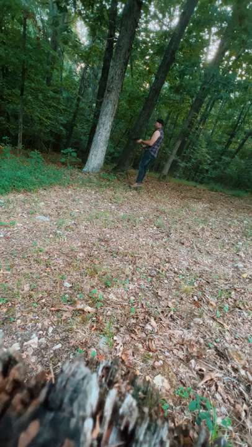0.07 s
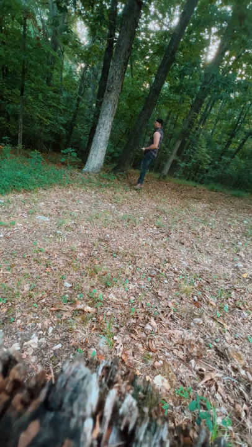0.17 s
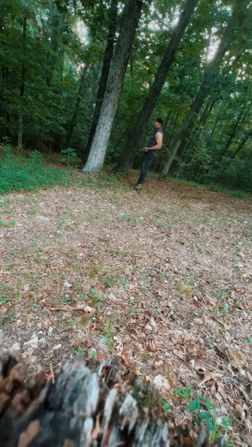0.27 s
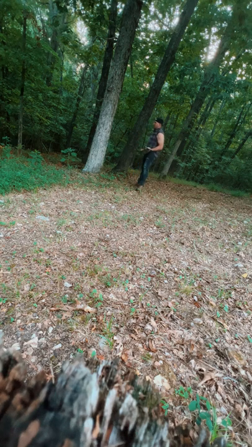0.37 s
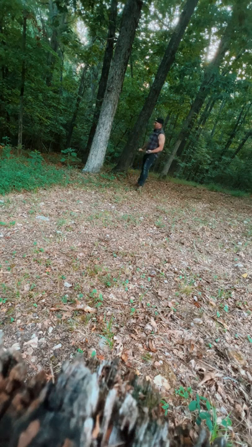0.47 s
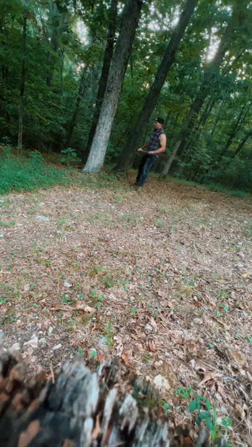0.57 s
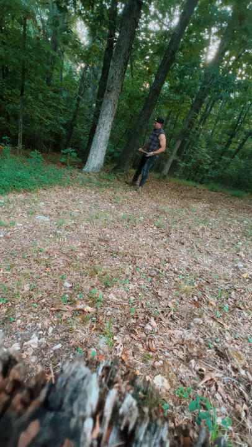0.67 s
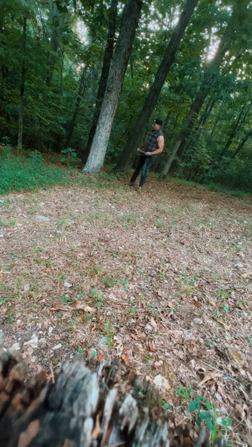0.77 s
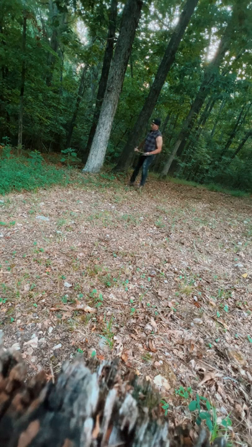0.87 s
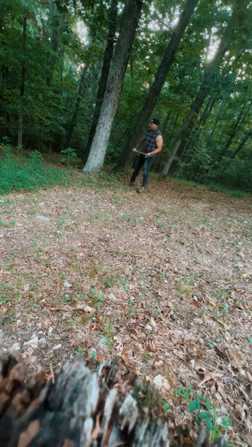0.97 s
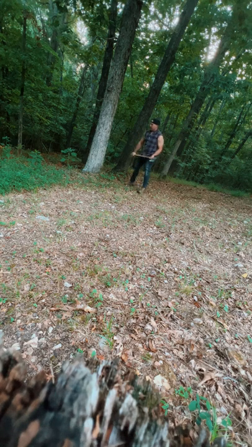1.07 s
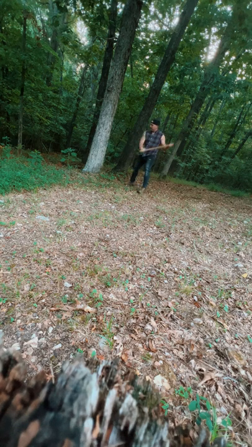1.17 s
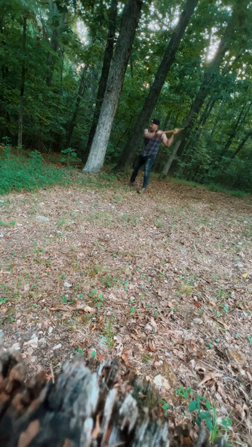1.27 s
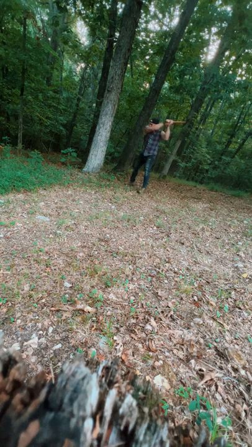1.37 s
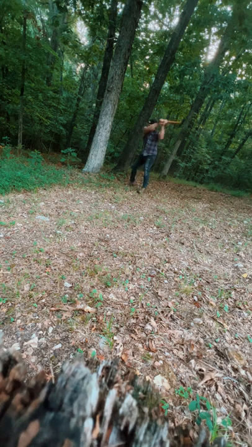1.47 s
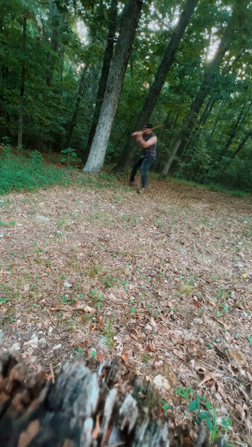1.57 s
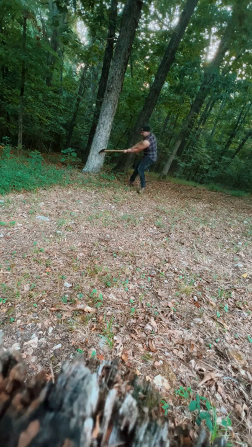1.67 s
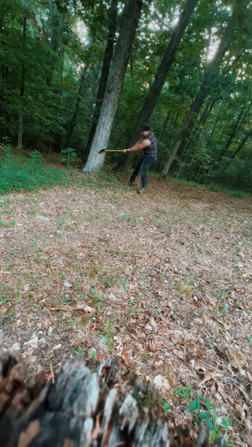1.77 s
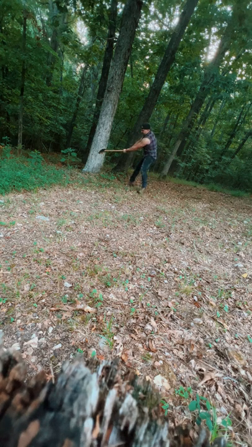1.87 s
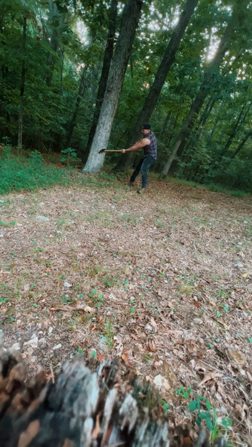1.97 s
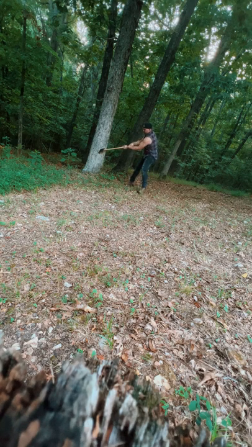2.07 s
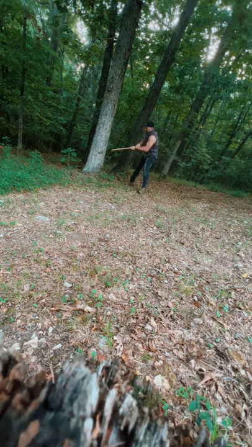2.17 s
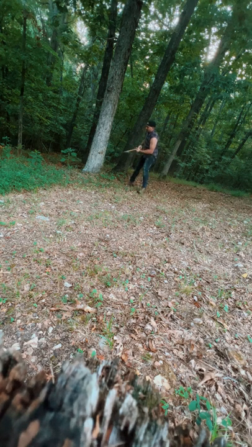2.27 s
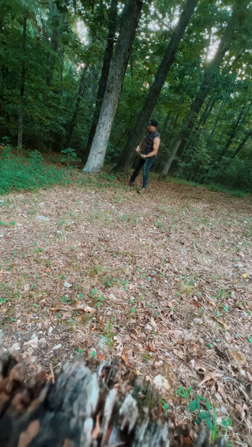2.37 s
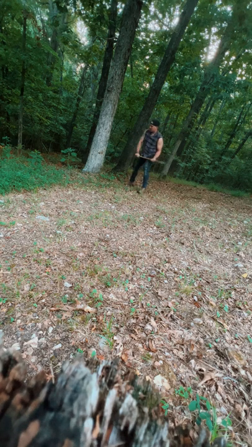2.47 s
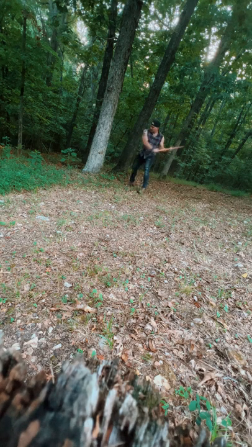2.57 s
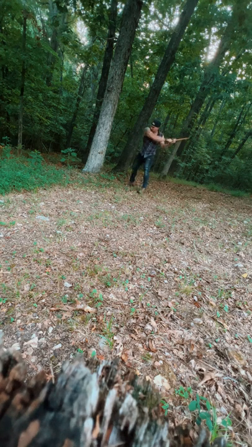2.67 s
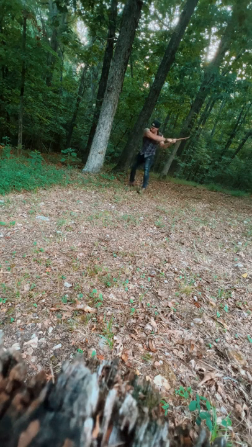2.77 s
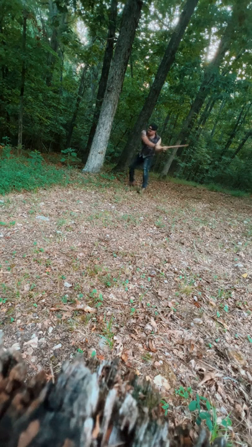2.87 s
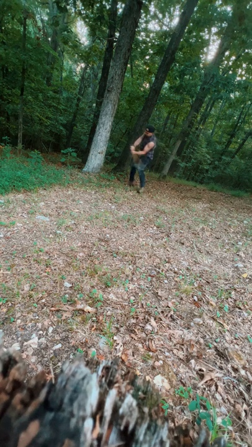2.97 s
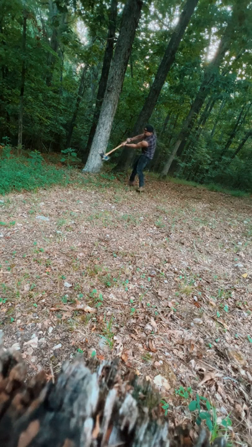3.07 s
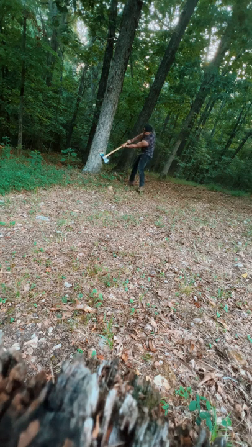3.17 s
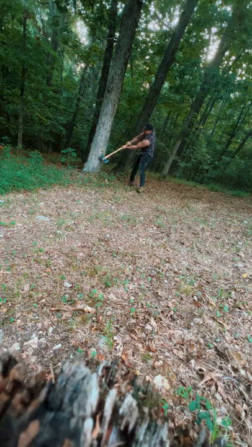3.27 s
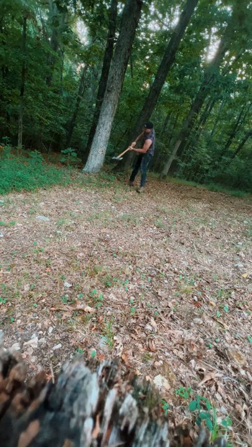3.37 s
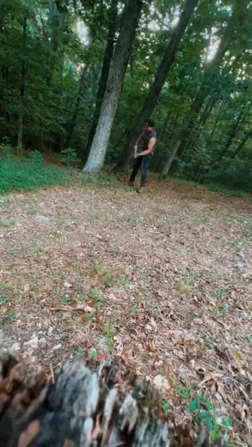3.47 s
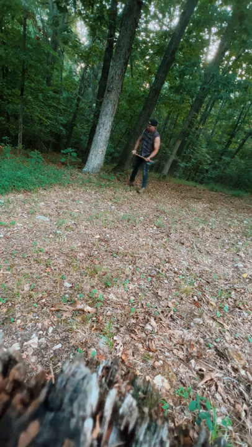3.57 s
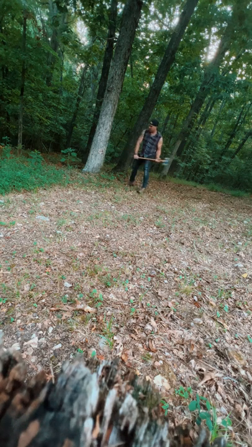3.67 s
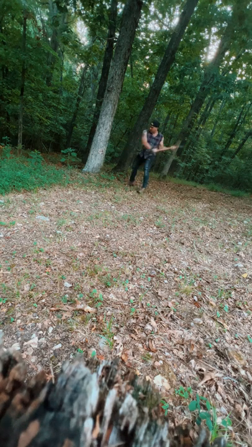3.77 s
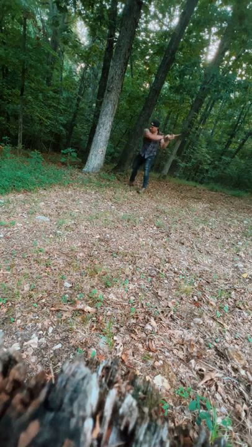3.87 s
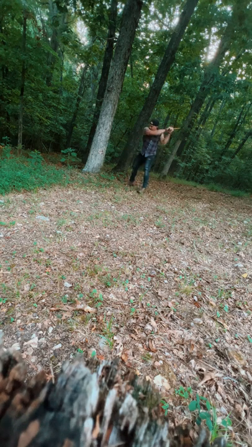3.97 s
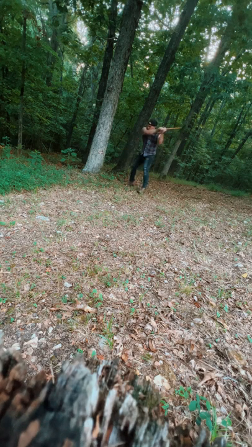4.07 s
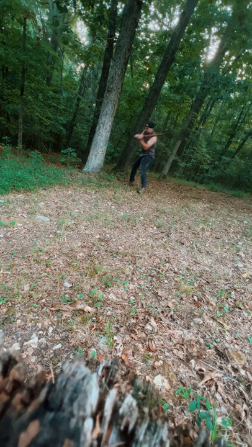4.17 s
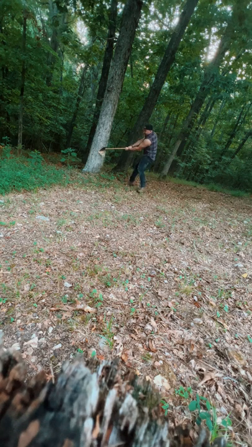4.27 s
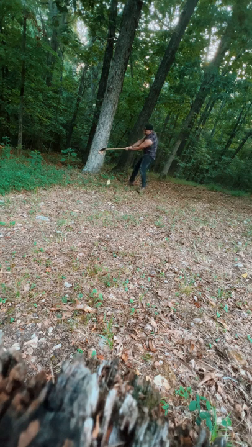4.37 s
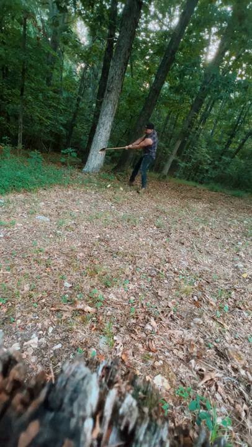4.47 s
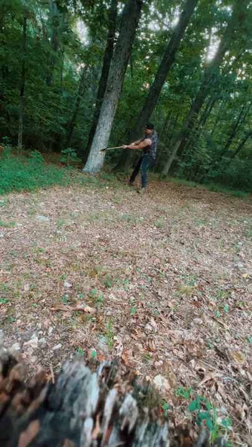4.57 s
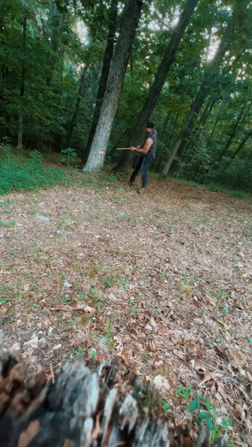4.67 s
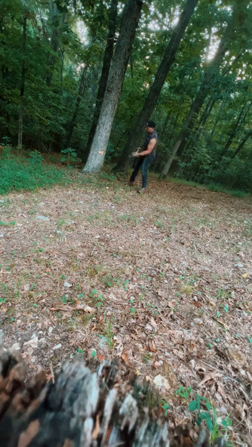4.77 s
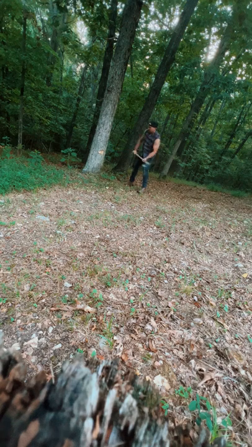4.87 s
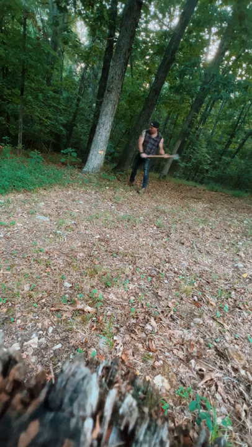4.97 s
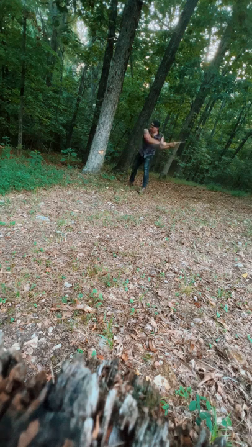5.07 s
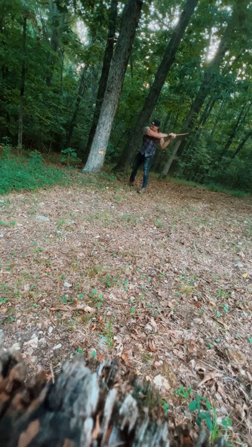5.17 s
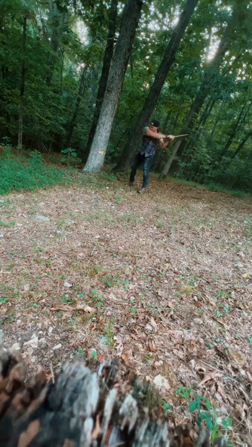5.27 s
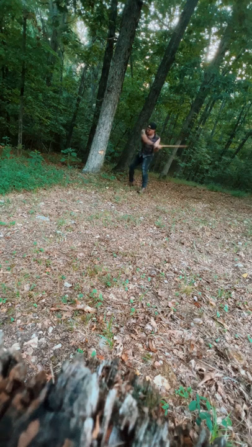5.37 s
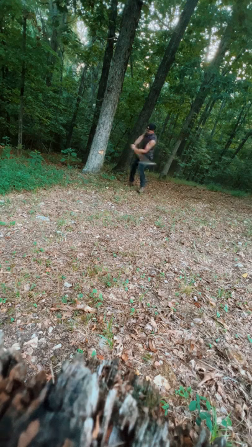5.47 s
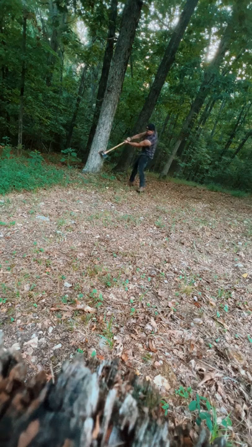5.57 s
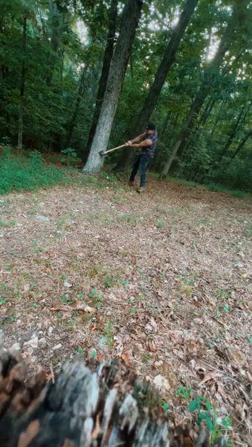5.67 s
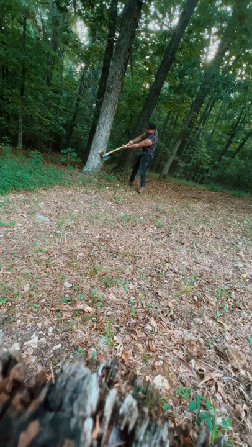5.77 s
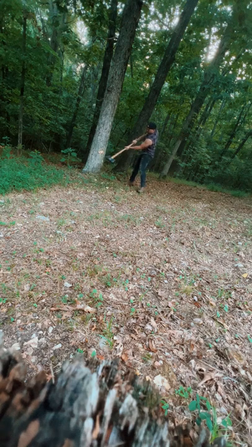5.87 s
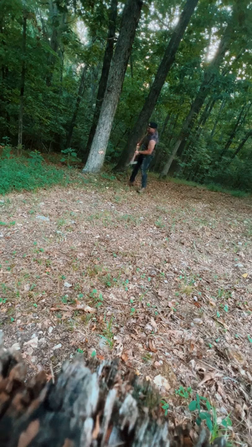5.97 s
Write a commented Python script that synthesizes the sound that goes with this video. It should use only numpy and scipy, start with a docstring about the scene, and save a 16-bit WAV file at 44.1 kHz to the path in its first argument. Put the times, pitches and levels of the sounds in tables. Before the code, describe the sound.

Four strong axe blows on a live tree, heard several metres off across soft leaf-covered ground. Each begins with a hard dry crack, knocks hollowly, then drops into a short thump, with wide woodland reverberation and a faint late echo. Leaves crunch softly beforehand, a dim far call passes early, and wood chips tick between strokes. Quiet high insects, low rumble and wavering far engines continue throughout.

```python
"""Axe blows in a clearing

Four blows into a standing tree, heard across leaf-covered ground: each cracks (shaped noise), rings
and thumps (damped modes). Soft ground delays the lows, so each blow sweeps downward; near trunks and
woods scatter it; a faint centred repeat follows 0.39 s later. Chips tick and dry leaves rustle (noise
bursts); a far call, insects and low rumble are filtered noise, far engines are wavering sines."""
import sys
import numpy as np
from scipy import signal
from scipy.fft import rfft, irfft, next_fast_len
from scipy.io import wavfile
from scipy.ndimage import uniform_filter1d, minimum_filter1d

SR = 44100
rng = np.random.default_rng(int(sys.argv[2]) if len(sys.argv) > 2 else 0)


def int16_out(signal):
    """Quantize to a 16-bit WAV file."""
    q = np.round(np.clip(np.atleast_2d(signal).T, -1, 1) * 32767)
    wavfile.write(sys.argv[1], SR, q.astype(np.int16))


N = 265041
T = np.arange(N) / SR
SIZE = 65536  # length of blows and responses, samples
T_RESPONSE = np.arange(SIZE) / SR
F = np.maximum(np.arange(SIZE // 2 + 1) * SR / SIZE, 1)


def undb(db):
    """Decibels to gain."""
    return 10 ** (np.asarray(db) / 20)


def unit(x):
    """Scale to rms 1."""
    return x / np.sqrt(np.mean(x ** 2))


def across(hz, table, axis=1):
    """Read a table column along log frequency."""
    table = np.array(table)
    return np.interp(np.log(np.maximum(hz, 1)), np.log(table[:, 0]), table[:, axis])


def along(table, axis=1):
    """Read a table column along time."""
    table = np.array(table)
    return np.interp(T, table[:, 0], table[:, axis])


def shape(x, gain):
    """Filter by a gain given as a function of frequency."""
    size = next_fast_len(x.shape[-1] + 4096)
    f = np.maximum(np.fft.rfftfreq(size, 1 / SR), 1)
    return irfft(rfft(x, size) * gain(f), size)[..., :x.shape[-1]]


def mode(f, hz, width_hz):
    """Response of one damped resonance, 1 at its centre."""
    return 1 / (1 + 1j * (f ** 2 - hz ** 2) / (f * width_hz))


def delay(s):
    """Pure delay as a phase slope over F."""
    return np.exp(-2j * np.pi * F * s)


def walk(knots_per_s):
    """Random curve, linear between 1024 unit-variance knots; holds the last knot if they run out."""
    knots = rng.standard_normal(1024)
    return np.interp(T * knots_per_s, np.arange(len(knots)), knots)


def add(track, s, x):
    """Mix a sound in at a time."""
    start = max(int(s * SR), 0)
    track[start:start + len(x)] += x[:N - start]


# low outdoor rumble spectrum: f/Hz, relative level/dB
RUMBLE = [(25, -32), (40, -22), (62, -14), (85, -4.5), (125, -7), (200, -15), (250, -13), (310, -21),
          (450, -24.5), (700, -30.5), (1200, -31.5), (2400, -38), (8000, -46)]
# insect chorus spectrum: f/Hz, relative level/dB
INSECTS = [(7000, -44.5), (8300, -21.5), (9050, -0.5), (9500, 1.5), (10000, 0), (10800, -5.5), (11600, -28),
           (13000, -26.5), (16000, -35)]
RUMBLE_DB, INSECT_DB = -54, -58


def background():
    """Low outdoor rumble and an insect chorus: coloured noise, its level fluttering slightly."""
    rumble = unit(shape(rng.standard_normal(N), lambda f: undb(across(f, RUMBLE))))
    insects = unit(shape(rng.standard_normal(N),
                         lambda f: undb(across(f, INSECTS)) / (1 + (5000 / f) ** 4)))
    return rumble * undb(RUMBLE_DB + .5 * walk(2.4)) + insects * undb(INSECT_DB + 1.3 * walk(45))


# far engine under changing load: t/s, main tone f/Hz, level/dB
ENGINE = [(0.0, 130.0, -60.5), (0.7, 122.0, -61.5), (1.5, 116.5, -64.5), (2.15, 126.5, -58.5),
          (2.9, 143.5, -53.5), (3.9, 156.5, -60), (5.4, 151.5, -53.5), (6.0, 128.5, -57)]
# its harmonics: multiple of main tone, relative level/dB
ENGINE_ORDERS = [(.5, -9), (1, 1.5), (1.5, -7)]
# hum of a far mains-driven machine: multiple of mains frequency, level/dB
HUM = [(3, -64.5), (4, -61), (6, -68.5)]
# drone of a second far motor: multiple of its speed, level/dB
FAN = [(3, -68.5), (6, -76.5), (7, -74.5)]
MAINS_HZ, FAN_HZ = 60, 88
ENGINE_WAVER, HUM_WAVER, FAN_WAVER = 0.0035, 0.00058, .0015  # fraction of f


def engines():
    """Far motors as sines: one rises and falls in speed, two hum with slight waver."""
    def tone(hz, db, waver):
        level = np.sqrt(2) * undb(db + 0.62 * walk(2.1))
        return level * np.sin(2 * np.pi * np.cumsum(hz * (1 + waver * walk(10))) / SR)
    main_hz, main_db = along(ENGINE), along(ENGINE, axis=2)
    motor = sum(tone(k * main_hz, main_db + db, ENGINE_WAVER) for k, db in ENGINE_ORDERS)
    hum = sum(tone(k * MAINS_HZ, db, HUM_WAVER) for k, db in HUM)
    fan = sum(tone(k * FAN_HZ, db, FAN_WAVER) for k, db in FAN)
    return motor + hum + fan


CALL_S, CALL_ATTACK_S, CALL_HOLD_S = .76, .11, .2
CALL_DB, CALL_FADE_DB_PER_S = -64, 32
CALL_HZ, CALL_WIDTH_HZ = 1229, 330


def far_call():
    """Faint far call, blurred by the woods to resonant noise: swells, holds, fades."""
    call = unit(shape(rng.standard_normal(N), lambda f: mode(f, CALL_HZ, CALL_WIDTH_HZ) ** 2))
    age = T - CALL_S
    fading_s = np.maximum(age - CALL_ATTACK_S - CALL_HOLD_S, 0)
    swell = np.clip(age / CALL_ATTACK_S, 0, 1)
    return call * swell * undb(CALL_DB - CALL_FADE_DB_PER_S * fading_s)


SPRAY_FLIGHT_S, SPRAY_RISE_S, SPRAY_DECAY_S = 0.12, 0.067, 0.051


def spray(age):
    """Envelope of bark after a blow: it flies, lands in the leaves, trickles out."""
    late = age - SPRAY_FLIGHT_S
    return np.exp(-(np.minimum(late, 0) / SPRAY_RISE_S) ** 2 - np.maximum(late, 0) / SPRAY_DECAY_S)


# dry-leaf spectrum: f/Hz, relative level/dB
LEAVES = [(500, 7.5), (1500, 0), (3000, -4.5), (6500, -1.5), (10000, 2), (13000, 1), (16000, -1.5)]
# rustles in dry leaves, from boots or falling bark: t/s, half length/s, level/dB
RUSTLES = [(.40, 0.067, -60), (.53, .025, -64), (.75, 0.14, -60), (.95, 0.11, -54.5), (1.2, .015, -59),
           (1.325, .025, -69), (2.326, 0.032, -61), (2.612, 0.053, -66), (3.39, 0.2, -62),
           (3.729, 0.014, -72), (3.9, 0.036, -66.5), (4.228, .042, -63), (5.033, 0.025, -64.5)]
CRUNCH_DB, CRUNCH_KNOTS_PER_S = 3, 290  # uneven give; knots run out after about 3.5 s
LEAF_STIR_DB = -86


def leaves():
    """Dry leaves as noise of uneven grains: separate rustles, and bark sprayed by each blow."""
    grains = rng.standard_normal(N) * undb(3.6 * np.minimum(rng.exponential(size=N), 5))
    crackle = unit(shape(grains, lambda f: undb(across(f, LEAVES)) / (1 + (300 / f) ** 2)))
    rustles = sum(undb(db) * np.exp(-((T - s) / length) ** 2) for s, length, db in RUSTLES)
    bark = sum(undb(spray_db) * spray(T - s) for s, *_, spray_db in CHOPS)
    crunch = undb(CRUNCH_DB * walk(CRUNCH_KNOTS_PER_S))
    return crackle * ((rustles + bark) * crunch + undb(LEAF_STIR_DB + 1.2 * walk(18)))


# larger chips landing, twigs snapping: t/s, peak level/dB, treble level/dB
CHIPS = [(0.74, -36.5, 7), (0.8355, -38, 12), (3.228, -35, 1), (3.2788, -33, 7), (3.3085, -32, 7),
         (3.516, -34, 2), (3.69, -43, 7), (4.4196, -30.5, 3), (4.4967, -33, 10), (5.805, -36, -4)]
CHIP_HZ, CHIP_WIDTH_HZ, CHIP_T60_S = 2360, 4700, 0.013


def chips():
    """Small dry pieces tick against bark and leaves: short noise through two broad modes."""
    out, t = np.zeros(N), np.arange(2048) / SR
    for s, db, treble_db in CHIPS:
        burst = rng.standard_normal(len(t)) * 1000 ** (-t / CHIP_T60_S)
        tick = shape(burst, lambda f: mode(f, CHIP_HZ, CHIP_WIDTH_HZ) + undb(treble_db) * mode(f, 10200, 5900))
        add(out, s, undb(db) * tick / abs(tick).max())
    return out


# scatter from trunks and leaves: f/Hz, early level/dB, late level/dB, late t60/s
WOODS = [(67.6, -3, -19.5, 0.6), (160.9, -4.5, -12.5, 0.6), (410, -9, -30.5, 1.3), (764, -19, -19, 0.59),
         (1510, -15, -15.5, 1.4), (3520, -12, -17, 0.54), (7590, -12, -18.5, 1.1),
         (15000, -18.5, -15.5, 0.33)]
EARLY_T60_S = 0.19


def woods():
    """Forest response in octave-spaced bands: quick scatter from near trunks, long tail from leaves."""
    t = T_RESPONSE
    spectrum, out = rfft(rng.standard_normal(SIZE)), 0
    early = 1000 ** (-t / EARLY_T60_S) * (1 - np.exp(-(t / 0.0018) ** 2))
    early = early / np.linalg.norm(early)
    for hz in 46 * 2 ** np.arange(10):
        band = irfft(spectrum * np.maximum(1 - abs(np.log2(F / hz)), 0))
        late = 1000 ** (-t / across(hz, WOODS, axis=3)) * (1 - np.exp(-t / 0.018))
        late = late / np.linalg.norm(late)
        out = out + band * np.hypot(undb(across(hz, WOODS)) * early,
                                    undb(across(hz, WOODS, axis=2)) * late)
    return out


# colour of the late repeat: f/Hz, width/Hz, level/dB
REPEAT = [(1444, 520, -1), (565, 180, -10), (5870, 6800, -14)]
REPEAT_S, REPEAT_DB = .3903, -15.5
REPEAT_TAIL_DB, REPEAT_TAIL_T60_S = -7, 0.27


def late_repeat():
    """Response of a faint, band-limited repeat at a fixed delay, with a soft noise tail."""
    tail = rng.standard_normal(SIZE) * 1000 ** (-T_RESPONSE / REPEAT_TAIL_T60_S)
    body = 1 + undb(REPEAT_TAIL_DB) * rfft(tail / np.linalg.norm(tail)) / (1 + (F / 2500) ** 2)
    colour = sum(undb(db) * mode(F, hz, width) for hz, width, db in REPEAT) / (1 + (400 / F) ** 4)
    return irfft(undb(REPEAT_DB) * body * colour * delay(REPEAT_S))


# splitting fibres spectrum: f/Hz, level/dB
CRACK = [(400, -17.5), (1100, 3), (2100, -1.5), (2700, -6.5), (3600, 5), (4200, -10.5), (5700, 1),
         (7600, -8.5), (9200, 2.5), (12000, -4), (16000, -8)]
# modes of the cut around the blade: multiple of ring f, width/Hz, level/dB
CUT = [(1, 170, -0.5), (1.298, 220, -14.5)]
# trunk modes before each blow's pitch factor: f/Hz, width/Hz
TRUNK = [(230, 430), (460, 590)]
BLADE_LAG_S, CUT_LAG_S = .0006, .0013
THUMP_LAG_S = .0017  # trunk gives way after the blade has bitten
GROUND_LOW_HZ, GROUND_TOP_HZ = 58.3, 750  # thump carries only between these
WOODS_RING_WIDTH_HZ = 880  # ring blurred by the trees


def chop(crack_db, bite_s, top_hz, blade_hz, blade_db, ring_hz, ring_db, thump_db, pitch, upper_db, send_db):
    """One blow, crack plus ring plus thump: heard straight on, and as the woods receive it all round."""
    t = T_RESPONSE
    # fibres split as the blade enters and slows, with a little late splintering
    bite = (1 - np.exp(-(t / 0.00053) ** 2)) * (np.exp(-t / bite_s) + undb(-19.5) * np.exp(-t / 0.0041))
    burst = rfft(rng.standard_normal(SIZE) * bite)
    even = burst / (abs(burst) + 1e-12)  # flat spectrum, phase kept
    fibres = rfft(irfft(even) * np.sqrt(bite))
    fibres = fibres / np.sqrt(np.mean(abs(fibres) ** 2))
    colour = undb(crack_db + across(F, CRACK)) / (1 + (F / top_hz) ** 4)

    # steel and cut ring for a few cycles only, gripped by the wood
    blade = undb(blade_db) * mode(F, blade_hz, 0.049 * blade_hz)
    cut_modes = sum(undb(db) * mode(F, k * ring_hz, width) for k, width, db in CUT)
    cut = undb(ring_db) * cut_modes / (1 + (1000 / F) ** 4)
    ring = blade * delay(BLADE_LAG_S) + cut * delay(CUT_LAG_S)

    # neighbouring trunk modes swing against each other
    low, upper = (mode(F, pitch * hz, width) for hz, width in TRUNK)
    trunk = low - undb(upper_db) * upper
    # porous ground swallows the thump's top and holds back its lows
    delay_s = .0021 * (1000 / np.maximum(F, 60)) ** .76
    ground = np.exp(-2j * np.pi * np.cumsum(delay_s) * SR / SIZE)
    ground = ground / (1 + (F / GROUND_TOP_HZ) ** 5) / (1 + (GROUND_LOW_HZ / F) ** 5)
    thump = undb(thump_db) * trunk * ground * delay(THUMP_LAG_S)

    # summed over all directions, peaks of crack and ring are smoothed
    spread_crack = even * np.sqrt(uniform_filter1d(colour ** 2, size=3000))
    spread_ring = undb(ring_db + send_db) * mode(F, 0.95 * ring_hz, WOODS_RING_WIDTH_HZ) ** 3
    ahead = fibres * colour + ring + thump
    around = spread_crack + spread_ring + thump
    return irfft([ahead, around])[:, :SIZE // 8]


# blows: t/s, crack level/dB, bite decay/s, crack top f/Hz, blade f/Hz, blade level/dB, ring f/Hz,
# ring level/dB, thump level/dB, trunk pitch factor, upper trunk mode level/dB,
# ring sent into woods level/dB, bark spray level/dB (played by leaves)
CHOPS = [(1.6812, 9.5, 0.0016, 16970, 5440, 22, 1776, 28.5, 33, 1.13, -13, -19.5, -49),
         (3.0453, 15, 0.00037, 10650, 3560, 6, 1438, 28.5, 25.5, 0.65, -26.5, -3.5, -60.5),
         (4.2803, 12, 0.0063, 15000, 9050, 21.5, 1610, 27.5, 34, 0.78, 1, -18.5, -59.5),
         (5.5412, 13.5, 0.000476, 17900, 10200, 20.5, 1649, 24.5, 34, 1.38, -7.5, -10, -59.5)]
# echoes from near trunks: delay t/s, level/dB, lowest f/Hz, highest f/Hz
ECHOES = [(0.0156, -10.5, 126.3, 603), (0.0194, -18, 151, 704), (0.0785, -19, 154, 496)]


def axe():
    """Blows convolved with trunks, woods and repeat: frontal sound, sideways scatter, late repeat."""
    direct, sent = np.zeros(N), np.zeros(N)
    for s, *blow, _ in CHOPS:
        ahead, around = chop(*blow)
        add(direct, s, ahead)
        add(sent, s, around)
    trunks = irfft(sum(undb(db) * delay(s) / (1 + (lo / F) ** 2) / (1 + 1j * F / hi)
                       for s, db, lo, hi in ECHOES))
    near = direct + signal.fftconvolve(direct, trunks)[:N]
    mid = near + signal.fftconvolve(sent, woods())[:N]
    scatter = signal.fftconvolve(sent, woods())[:N]  # fresh draw, so it differs from mid
    repeat = signal.fftconvolve(direct, late_repeat())[:N]
    return mid, scatter, repeat


# two microphone ports: f/Hz, left minus right level/dB, left lead/rad
PORTS = [(130, .3, 0), (300, 2.2, .1), (550, 4.5, .1), (850, 9, -.7), (1100, 3, -1.6), (1500, -3, -1.2),
         (2000, -7, -.8), (2700, -5, 0), (3500, -2, .3), (4400, 2, -.8), (5500, 3, -.5), (7000, 2, -1.4),
         (9000, .3, .1), (11000, .3, .1), (13000, .3, -1)]


def ports(f):
    """Each microphone port colours and delays near sound in its own way; their mean gain is 1."""
    half = undb(across(f, PORTS) / 2) * np.exp(.5j * across(f, PORTS, axis=2))
    return np.array([half, 1 / half]) / abs((half + 1 / half) / 2)


WIDE_LOW_HZ, WIDE_HIGH_HZ = 550, 6200  # sides differ mainly in this range
SCATTER_SIDE_DB, BACKGROUND_SIDE_DB, BASS_SIDE_DB = 0.5, -5, -27
ENGINE_PAN_DB = 1.7  # left minus right


def scene():
    """Work ahead in wide, diffuse woods; late repeat and call dead centre, motors a little left."""
    blows, scatter, repeat = axe()
    mid = blows + chips() + leaves() + background()
    diffuse = undb(SCATTER_SIDE_DB) * scatter + undb(BACKGROUND_SIDE_DB) * background()

    def width(f):
        return (undb(BASS_SIDE_DB) + 1 / (1 + (WIDE_LOW_HZ / f) ** 2)) / (1 + (f / WIDE_HIGH_HZ) ** 3)
    side = shape(diffuse, width)
    motors = engines() * undb(np.array([[ENGINE_PAN_DB], [-ENGINE_PAN_DB]]) / 2)
    return shape(np.array([mid + side, mid - side]), ports) + repeat + far_call() + motors


LIMIT, TOP_HZ = 0.76, 15900


def record(dry):
    """Quick limiter, one gain for both sides, holds the peaks; a steep low-pass cuts the top."""
    gain = LIMIT / np.maximum(abs(dry).max(axis=0), LIMIT)
    x = dry * uniform_filter1d(minimum_filter1d(gain, size=45), size=45)
    return signal.sosfilt(signal.ellip(8, .2, 70, TOP_HZ, fs=SR, output="sos"), x)


dry = scene()
out = record(dry)
int16_out(out)
```